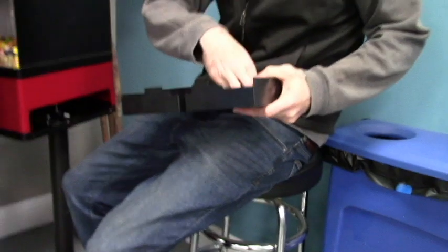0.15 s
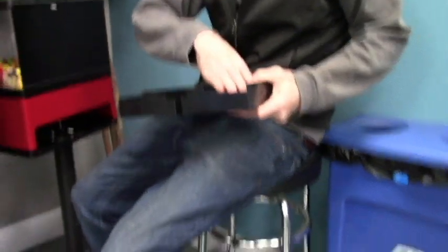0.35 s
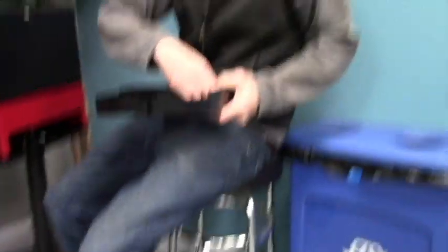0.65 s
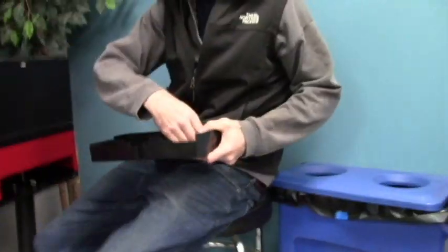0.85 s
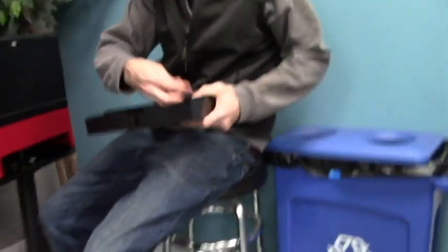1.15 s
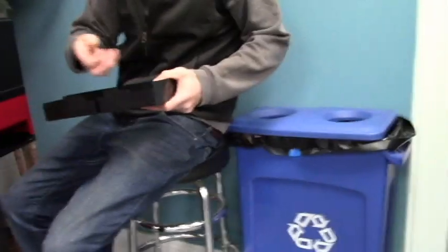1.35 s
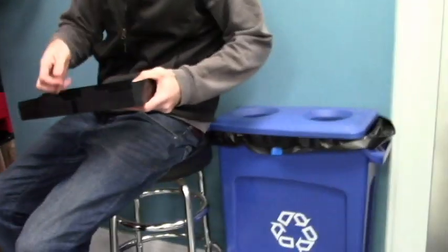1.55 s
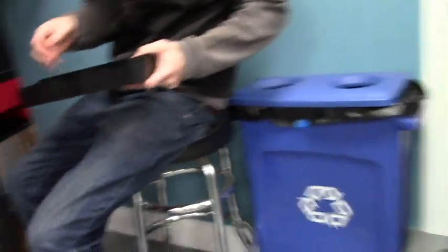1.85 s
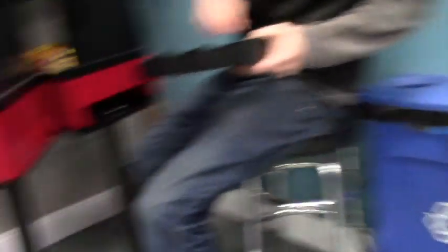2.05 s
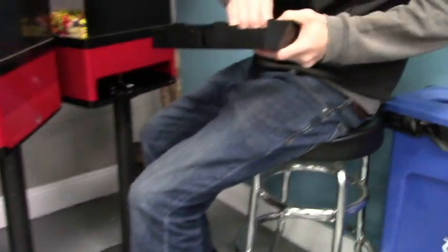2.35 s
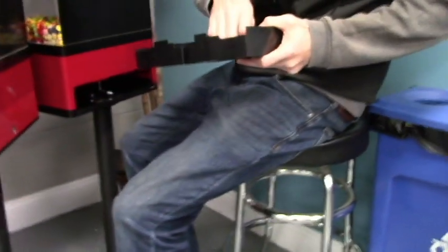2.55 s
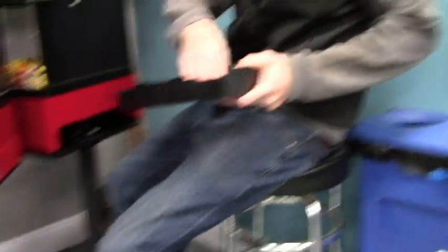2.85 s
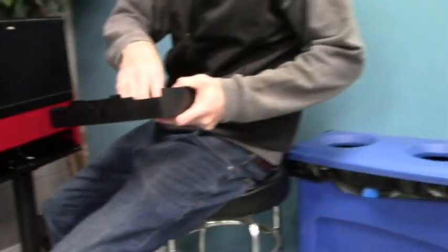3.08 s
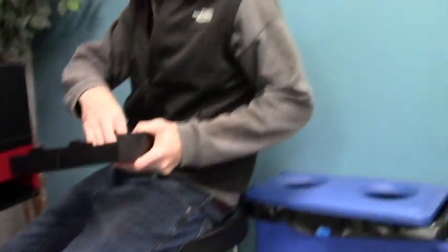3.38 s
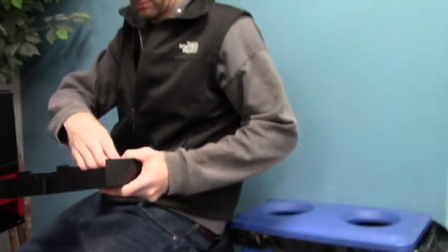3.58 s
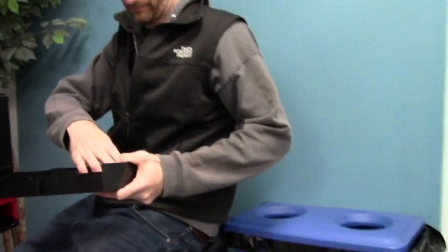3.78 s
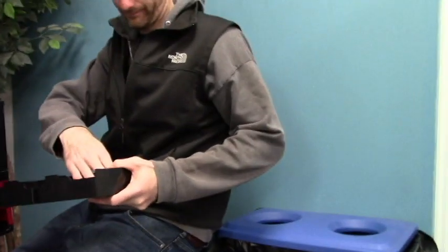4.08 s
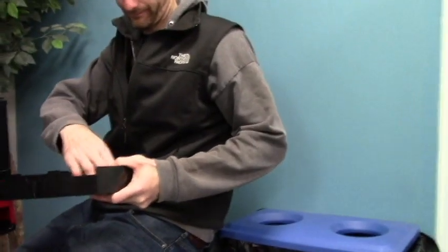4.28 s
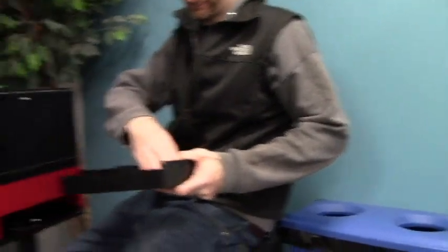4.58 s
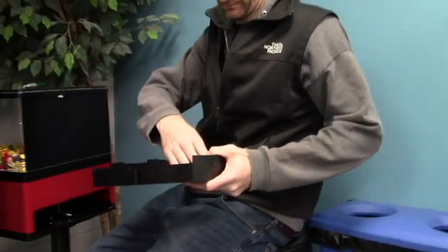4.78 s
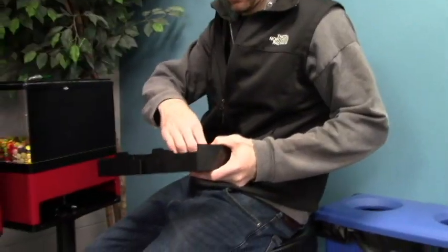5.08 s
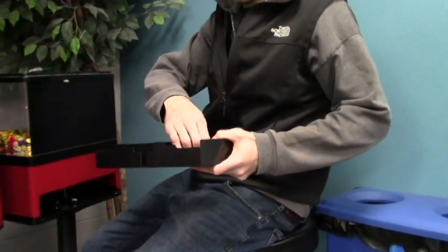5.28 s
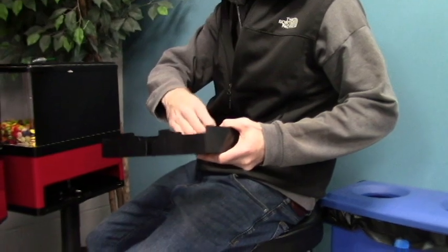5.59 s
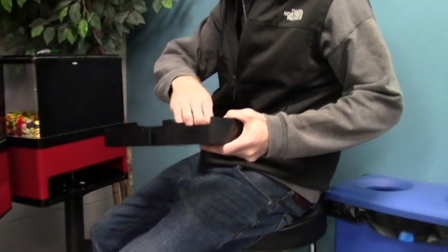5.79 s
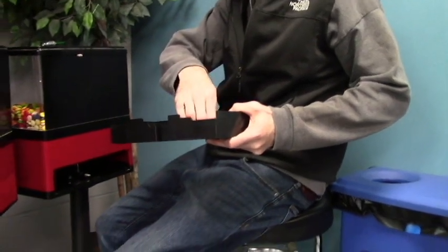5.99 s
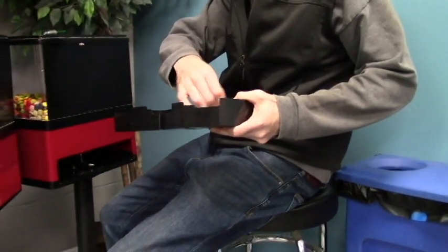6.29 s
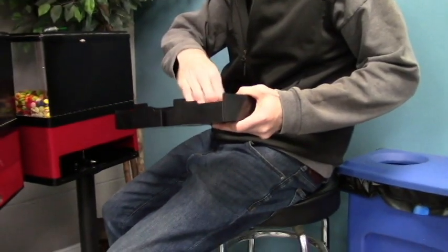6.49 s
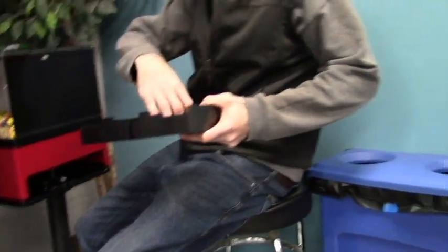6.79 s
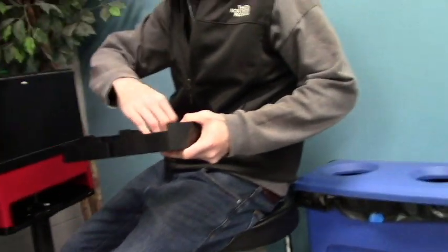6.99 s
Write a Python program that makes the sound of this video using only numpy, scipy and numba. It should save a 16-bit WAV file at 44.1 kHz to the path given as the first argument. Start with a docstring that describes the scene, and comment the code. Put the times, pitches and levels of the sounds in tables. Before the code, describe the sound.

Coins are picked through by hand in a plastic tray, heard closely in a small hard-walled room with steady low motor hum, gently beating, and soft fan rush. It opens at once with loud clacks and a gritty slide, a soft tray knock at 0.2 s, and more small clinks to 0.6. Around 0.9-1.2 s there is scraping, a short rising plastic groan, and sharp clacks. Then it thins, with faint high coin rings at 1.2-1.7. A loud scatter bursts at 1.8-2.0, followed by light picking. Clatter thickens from 2.9 and peaks at 3.9-4.2, with more strong clacks at 4.7 and 5.05. After a sparse stretch with small clicks at 5.5 and 5.7, a handful drops at 6.1 with the heaviest, hollow thump; dull knocks and bright clatter crowd 6.3-6.65, then faint taps settle into the hum by 7.

```python
"""Coins are picked through in a plastic tray on a lap, in a small hard-walled room with a machine humming throughout.
From the start, pushed coins slide as trains of tiny contacts and landing coins clack as short filtered noise bursts.
Soft knocks on the tray follow from 0.2 s, faint modal rings from 0.4 s, and a stick-slip groan at 0.9 s.
A handful is dropped back in near 6.1 s, with the heaviest knock; a limiter ducks under the loudest clatter."""
import sys
import numpy as np
from scipy import signal
from scipy.fft import rfft, irfft, next_fast_len
from scipy.io import wavfile
from scipy.ndimage import uniform_filter1d, minimum_filter1d
from numba import njit

SR = 44100
rng = np.random.default_rng(int(sys.argv[2]) if len(sys.argv) > 2 else 0)


def bounce(signal):
    """Save signal as a 16-bit WAV file at the path given by the first command-line argument."""
    frames = np.transpose(np.atleast_2d(signal))
    limited = np.clip(frames, -1, 1)
    pcm = np.round(limited * 32767).astype(np.int16)
    wavfile.write(sys.argv[1], SR, pcm)


N = 314785


def undb(db):
    """Level definition: an amplitude ratio is ten to the power dB / 20."""
    return 10 ** (np.asarray(db) / 20)


def unit(x):
    """Energy normalisation: the squared samples sum to one."""
    return x / np.sqrt(np.sum(x ** 2) + 1e-18)


def fade(t, t60):
    """Exponential decay, 60 dB down after t60 seconds."""
    return np.exp(-np.log(1000) * t / t60)


def colour(x, points):
    """Minimum-phase filtering: folding the cepstrum makes a (Hz, dB) gain outline causal."""
    size = next_fast_len(len(x) // 2 + 1024, real=True) * 2
    outline_hz, outline_db = np.transpose(points)
    f = np.maximum(np.arange(size // 2 + 1) * SR / size, 1)
    gain_db = np.interp(np.log(f), np.log(outline_hz), outline_db)
    cepstrum = irfft(np.log(undb(gain_db)))
    cepstrum[1:size // 2] *= 2
    cepstrum[size // 2 + 1:] = 0
    response = np.exp(rfft(cepstrum))
    return irfft(rfft(x, size) * response)[:len(x)]


def band_power(x, lo_hz, hi_hz):
    """Parseval's theorem: the energy between two frequencies is summed from the spectrum."""
    f = np.arange(len(x) // 2 + 1) * SR / len(x)
    inside = (f > lo_hz) & (f < hi_hz)
    return 2 * np.sum(np.abs(rfft(x)[inside]) ** 2) / len(x) + 1e-18


def add(track, s, sound):
    """Superposition: mix a sound into the track at time s."""
    i = int(np.clip(s * SR, 0, N - 1))
    track[i:i + len(sound)] += sound[:N - i]


def walk(rate):
    """Slow random drift: normal draws, rate of them per second, joined by straight lines."""
    t = np.arange(N) / SR * rate
    return np.interp(t, np.arange(1024), rng.standard_normal(1024))


def ring(modes, t, detune, scatter_db):
    """Modal synthesis: decaying sines, whose pitch and weight are redrawn at each call."""
    chance = rng.standard_normal((len(modes), 2))
    out = 0
    for (hz, db, t60), (weight, shift) in zip(modes, chance):
        mode = np.sin(2 * np.pi * hz * (1 + detune * shift) * t) * fade(t, t60)
        out = out + undb(db + scatter_db * weight) * unit(mode)
    return out


# early echoes and late tail: level in dB, t60 in s
ECHO_DB, ECHO_T60, TAIL_DB, TAIL_T60 = 3, 0.16, -4.5, 0.49
TAIL_DAMP = 0.67  # how much the far walls dull the tail (0-1)


def echoes():
    """Room reverberation: a quick spray from nearby surfaces, then a duller diffuse tail, drawn anew at each call."""
    t = np.arange(SR // 2) / SR
    near, gaps, far = rng.standard_normal((3, len(t)))
    spray = unit(near * undb(3.4 * gaps) * fade(t, ECHO_T60) * np.minimum(t / 0.00098, 1))
    tail = unit(far * fade(t, TAIL_T60) * np.minimum(t / 0.057, 1))
    dull_tail = signal.lfilter([1 - TAIL_DAMP], [1, -TAIL_DAMP], tail)
    return undb(ECHO_DB) * spray + undb(TAIL_DB) * dull_tail


def blow(chatter_s, rise_s=0.0011, patchy_db=3):
    """Impact excitation: a burst of tiny contacts swells and settles, followed by its echoes."""
    echo = echoes()
    t = np.arange(len(echo)) / SR
    grit, gaps = rng.standard_normal((2, len(t)))
    swell = np.exp(-t / chatter_s) * (1 - np.exp(-t / rise_s))
    return unit(grit * undb(patchy_db * gaps) * swell) + echo


# Modes of the tray.
# Each row: frequency in Hz, level in dB, t60 in seconds.
TRAY_MODES = [(673.2, -16.5, 0.32), (842, -22, 0.15), (1048, -14, 0.11), (1320, -18.5, 0.045),
              (1987, -23, 0.06), (3313, -23.5, 0.011)]
# Filter outline of the damped coin heap.
# Each row: frequency in Hz, gain in dB.
HEAP_OUTLINE = [(60, -57), (200, -22.5), (400, -6.5), (700, 1), (1200, -0.5), (2000, 0), (3200, 0.5),
                (4500, -1.5), (6500, -2), (8000, -5), (10000, -3), (12500, -10.5), (14750, -17),
                (15150, -12), (15700, -14.5)]


def heap(force):
    """Source-filter principle: contact forces sound through the damped heap and shake the tray under it."""
    body = ring(TRAY_MODES, np.arange(SR // 12) / SR, detune=.02, scatter_db=3)
    shaken = signal.fftconvolve(force, body)[:len(force)]
    return colour(force + undb(-9.5) * shaken, HEAP_OUTLINE)


def wedged(t60, count=11):
    """Heavy damping: pressed coins ring briefly, redrawn for each landing and each small group of sliding contacts."""
    modes = [(hz, 0, t60) for hz in np.geomspace(1200, 11000, count)]
    return unit(ring(modes, np.arange(SR // 12) / SR, detune=.1, scatter_db=4))


SHAFT_HZ = 24.15  # turns of the fan shaft per second
# Multiples of the shaft speed that hum.
# Each entry: multiple of the shaft frequency (no unit).
SHAFT_MULTIPLES = (3, 4, 7, 8, 9, 10, 15)
# Strength of each shaft multiple, in the same order.
# Each entry: rms level in dB.
SHAFT_LEVELS = (-63.5, -64.5, -57.5, -67, -49.5, -52.5, -49)
# Spectrum outline of the rushing air.
# Each row: frequency in Hz, relative level in dB per Hz.
AIR_OUTLINE = [(25, -22), (60, -22), (110, -10), (217, -0.5), (309, -1), (591, -2.5), (695, -8.5),
               (775, -6.5), (840, -11), (1400, -16), (1520, -16.5), (7710, -30.5), (9070, -34),
               (11600, -39), (16000, -34)]
AIR_DB = -40.5  # rms, before a slow drift
# a motor slips just behind the mains hum; both are in step at IN_STEP_S
MAINS_HZ, SLIP_HZ, IN_STEP_S = 120, .92, 1.28
MAINS_DB, MOTOR_DB = -50, -55  # rms


def machine():
    """Beating and harmonics: a motor beats with the mains hum beside fan-shaft tones, over the rush of moved air."""
    t = np.arange(N) / SR - IN_STEP_S

    def tone(hz, db, drift=0):
        """Simple harmonic motion at an rms level; drift in radians."""
        return undb(db) * np.sqrt(2) * np.cos(2 * np.pi * hz * t + drift)

    motor = tone(MAINS_HZ, MAINS_DB) + tone(MAINS_HZ - SLIP_HZ, MOTOR_DB)
    wander = .03 * walk(2.5)
    shaft = sum(tone(k * SHAFT_HZ, db, k * wander) for k, db in zip(SHAFT_MULTIPLES, SHAFT_LEVELS))
    air = unit(colour(rng.standard_normal(N), AIR_OUTLINE)) * np.sqrt(N)  # rms of one
    return motor + shaft + undb(AIR_DB + 0.49 * walk(4.12)) * air


def clink(force):
    """Resonant coupling: a group of sliding contacts is tinted by the quickly damped ring of the coins it meets."""
    return force + undb(-9) * signal.fftconvolve(force, wedged(t60=.012))[:len(force)]


# a push of GRIP_DB takes hold in GRIP_S; the heap settles once it ends
GRIP_S, GRIP_DB, SETTLE_T60_S = 0.0078, -20, 0.087


def push(t, length, db):
    """Friction drive: a push takes hold, more slowly when gentler, lasts, and dies away as the coins settle."""
    grip_s = GRIP_S * np.sqrt(undb(GRIP_DB - db))
    return np.minimum(t / grip_s, 1) * fade(np.maximum(t - length, 0), SETTLE_T60_S)


# Fingers push coins over each other.
# Each row: start in seconds, length of the push in seconds, level in dB,
# tray body in dB and bright edge in dB, both relative to that level.
PUSHES = [(0, 0.1, -20.5, -11, -10.5), (.245, 0.06, -31.5, -6, -4.5), (.29, .025, -19, -7, -5.5),
          (.474, 0.018, -25, -4, -14), (.55, 0.16, -38.5, -2, -13), (.79, 0.054, -40, 8, -10),
          (.875, 0.17, -22.5, -5.5, -8), (1.065, 0.088, -20.5, -6, -1), (1.17, 0.1, -26.5, -10.5, -7),
          (1.335, 0.064, -46.5, -14, 7.5), (1.628, 0.022, -41.5, -16, 16.5), (1.767, 0.18, -13.5, -5, -3),
          (2.262, 0.08, -30, -1, -11.5), (2.43, 0.12, -45, 1, -8), (2.589, 0.15, -48, 5, -11),
          (2.864, 0.037, -23.5, -14, -18), (3.424, 0.041, -20.5, -11, -6), (3.455, 0.062, -22.5, -6.5, -7),
          (3.615, .13, -29, -1.5, -3.5), (3.893, 0.075, -25, -8, -6.5), (3.924, 0.07, -19, -19, -2.5),
          (4.085, 0.04, -16, -14, -12), (4.16, 0.1, -32.5, -8, -16), (4.359, 0.074, -32, -8, -12.5),
          (4.535, 0.057, -26.5, -7, -10), (4.645, .08, -28.5, -3.5, 1), (5.04, 0.025, -14, -16, -5),
          (5.115, 0.0073, -19, -20, 3), (5.435, 0.074, -40.5, -1, -12), (5.71, 0.042, -34, 1, -8),
          (5.745, 0.0053, -14, -21, -12), (5.97, 0.03, -51, -12, 3), (6.22, 0.04, -32.5, -8, 4),
          (6.46, 0.045, -21, -11, -2.5), (6.89, .05, -35, -4.5, -12.5)]
# Tray body, clack and bright edge of a contact.
# Each row: low limit in Hz, high limit in Hz.
CONTACT_BANDS = [(400, 1200), (1200, 5000), (5000, 18000)]
CONTACTS_PER_S = 560


def stirs(spread_db=4.5, colour_scatter_db=4, echo_db=-4.5, count=4):
    """Sliding friction as a random impulse train: hundreds of contacts a second, some dull, some bright."""
    out, t = np.zeros(N), np.arange(SR // 2) / SR
    n = len(t)
    for s, length, db, body_db, edge_db in PUSHES:
        effort = push(t, length, db)
        hit, size = rng.random((2, n))
        coin = rng.integers(0, count, n)
        sign = rng.choice([-1, 1], n)
        contacts = (hit < CONTACTS_PER_S / SR) * sign * undb(-spread_db * np.log(size + 0.089))
        for band, band_db in zip(CONTACT_BANDS, (db + body_db, db, db + edge_db)):
            force = contacts * undb(colour_scatter_db * rng.standard_normal(n))
            # the hand's push sets the power, however many contacts share it
            local_power = uniform_filter1d(force ** 2, size=1800)
            force = effort * force / np.sqrt(local_power + 1e-3)
            x = heap(sum(clink(force * (coin == k)) for k in range(count)))
            x = signal.sosfilt(signal.butter(3, band, "band", fs=SR, output="sos"), x)
            x = x + undb(echo_db) * signal.fftconvolve(x, echoes())[:n]
            add(out, s, undb(band_db) * unit(x) * np.sqrt(np.sum(effort ** 2)))
    return out


# Coins land on the heap.
# Each row: start in seconds, strength in dB, pitch of the clack in Hz, tray body in dB,
# bright edge in dB, decay constant of the contact chatter in ms.
LANDINGS = [(0.0014, 15, 1380, -5.5, -3.5, 5), (0.0371, 14, 3160.0, -10, -5.5, 3.4),
            (0.0649, 19.5, 1300, -4.5, -7, 10), (0.135, 0, 1400.0, -4, -3.5, 1.5),
            (0.3074, 8, 4500, -3, 4, 3.0), (0.416, -7.5, 2570.0, -1, -4, 3.0),
            (0.4583, -3, 1400.0, 6, -6, 3.0), (0.4741, 11.5, 2680, 2, -11, 3.3),
            (0.4899, 14, 4630, -2, -1.5, 4.4), (0.5453, 0.0, 2120.0, 0.0, -1, 2.0),
            (0.6157, 0, 1460, -12.0, -8.5, 1.8), (0.6552, -7.5, 1400.0, 5, -7.0, 1.75),
            (0.814, -1.5, 1560, 7, -9, 3.2), (0.8278, -2.5, 1500, -1, -12, 2.3),
            (0.8723, 10, 2040.0, -15.0, -12, 1), (0.9057, 9, 4340, -9.0, -5.5, 1.7),
            (0.9718, 10.0, 1410, 2, -25, 3.3), (0.9954, 11, 4140.0, -21, 1.5, 8.4),
            (1.062, 15, 3410.0, -22, 0.5, 2.7), (1.0911, 19.5, 3450, -32, -12, 1),
            (1.1897, 4.5, 4300.0, -20, -10, 3.0), (1.233, 6.0, 4150, -1.5, -1.5, 7.1),
            (1.3061, 0, 4440, -13, 0.5, 2.0), (1.7664, 21, 3160.0, -3, 2, 4.5),
            (1.8894, 17, 2820, -20, 0.5, 5.3), (1.9177, 20, 2760, -28, -3, 2.5),
            (2.0293, 9.0, 3550, -0.5, -5.5, 2.48), (2.1952, -3.5, 3880.0, 7.5, -4, 2.0),
            (2.2063, 7.5, 3900, -6, -5.5, 1.9), (2.248, -0.5, 3100, -2, -3, 2.0),
            (2.2618, 12.0, 1590, 1, -11, 3.5), (2.2803, 7.0, 1960, -18, -19, 2.0),
            (2.3078, 6.0, 3020, -10, -5.5, 1.4), (2.4644, -3.5, 2360, -10, -10, 3.4),
            (2.587, -2.5, 1580, 2.5, -8, 2.8), (2.6564, -7.0, 2960.0, -4, -4.5, 3.7),
            (2.7657, 1, 1540, -1.5, -13, 2.8), (2.8973, 4.5, 2920, -6, 1.5, 3.0),
            (2.9254, 13.5, 4450, -9.0, -14, 4.1), (2.9935, 9.5, 2360, -7.5, -7.0, 4.6),
            (3.0709, -2.5, 1460, 4.5, -15.0, 7.1), (3.1402, 11.0, 2400, -20.0, -5.5, 4.2),
            (3.229, -2.0, 1500, -11.0, -7, 2.5), (3.2523, 11.0, 3200, -12, -3.0, 5.6),
            (3.3504, 5.5, 1560, -3.5, -4, 1.5), (3.4493, 11, 6500, -10, 2, 3.6),
            (3.4605, 12.5, 3200.0, -14, -14, 2.3), (3.506, 11, 2500.0, -34, -0.5, 2.9),
            (3.6048, 9, 1820, 1.5, -5, 1.6), (3.6148, 15.5, 1510, -9, -27, 1),
            (3.6611, 14.5, 6760, -4, -0.5, 0.82), (3.6948, 13.5, 2530, -7, -24, 2.5),
            (3.8041, 12.0, 6330.0, -7, -7, 1.5), (3.9434, 21.5, 3720, -4, -4, 5.5),
            (4.0931, 19.5, 3350, -18, -20.0, 1.6), (4.1156, 15.5, 1870, -10, -20.0, 5.4),
            (4.2264, 16.0, 5000, -13, -3.5, 6.8), (4.4879, -8.5, 6300, -14, -5, 2.2),
            (4.5522, 9.5, 2360, -13, -12.5, 2.7), (4.6403, 8.0, 6700, -24, -4, 3.6),
            (4.6896, 6.0, 1960.0, -16, -4.0, 3.8), (4.7117, 19, 4160, -10, -1.5, 6.3),
            (4.8442, -0.5, 1820, -2, 1.5, 15), (5.04, 15.5, 4160, 0.5, 1, 4.4),
            (5.0608, 19.5, 2520, -30, -5, 2.1), (5.0732, -7, 2570.0, -17, 22.5, 2.0),
            (5.472, -2.5, 2710, 8, -16, 3.5), (5.5259, 8.0, 2440, -2.5, -1.5, 0.9),
            (5.7074, 4.5, 2410.0, -8.0, -1.0, 3.4), (5.7217, 5, 1490.0, 0, -1, 1.4),
            (5.7457, 8, 1670, -2, 4, 2.3), (6.101, -4.0, 1370, -9, -9, 21),
            (6.1292, 21.5, 3520, 1, -6.5, 2.5), (6.243, 0.5, 2530.0, -13, 2, 2.0),
            (6.2756, 20, 2450, -1, -9.5, 6.5), (6.3205, 12.5, 2600.0, -8, -10, 3.3),
            (6.4303, 14, 5400, -11, -5, 2.9), (6.4467, 17.5, 6250.0, -1, -3.5, 10),
            (6.6912, -7.5, 1460.0, 14, -13, 2.5), (6.7603, -8, 1400.0, 4, -9, 2.5),
            (6.8034, 0.0, 1800, 4, -6, 5.1), (6.9292, -9, 1400.0, 2, -20, 2.1)]
# Plate modes of a coin, which also ring in chimes().
# Each row: frequency in Hz, level in dB, t60 in seconds.
COIN_MODES = [(6200, -27, .2), (9650, -15, 0.067), (9400, 14, 0.096), (9870, 2, 0.04), (10800, -15, 0.073),
              (15200, -4, 0.19), (15400, -4, 0.15)]


def clacks(clink_db=-7, clink_t60=0.1, shimmer_db=-14, pitch_db=2, pitch_q=9):
    """Damped impact: a landing coin gives a dry, pitched clack, a short clink and a shimmer of coins around it."""
    out, t = np.zeros(N), np.arange(SR // 5) / SR
    for s, db, hz, body_db, edge_db, chatter_ms in LANDINGS:
        force = blow(chatter_ms / 1000)
        add(force, 0, undb(clink_db) * wedged(clink_t60))
        resonator = signal.iirpeak(hz, pitch_q, fs=SR)
        force = force + undb(pitch_db) * signal.lfilter(*resonator, force)
        x = colour(heap(force), [(750, body_db), (1600, 0.014), (3800, 0.0058), (7500, edge_db)])
        # strength is the energy of the middle band, so body and edge stay relative to it
        add(out, s - .0005, undb(db) * x / np.sqrt(band_power(x, 1240, 5100)))
        shimmer = unit(ring(3 * list(COIN_MODES), t, detune=.012, scatter_db=2))  # three coins
        add(out, s, undb(db + edge_db + shimmer_db) * shimmer)
    return out


# Dull knocks on the tray.
# Each row: start in seconds, strength in dB, gain of the upper knock in dB,
# floor panel and rim in dB relative to the strength.
TRAY_KNOCKS = [(.227, 14.5, -5, -41), (0.859, 7, -4, -17), (1.084, 6.5, -2, -25), (6.13, 21, 1, 1.5),
               (6.329, 12, -4, -16), (6.402, 18.5, -10.5, -20), (6.416, 18.5, -5, -22),
               (6.466, 17, -5.5, -28), (6.481, 17, -7, -28), (6.562, 13, -13, -17), (6.628, 18, -7, -38.5)]
# Filter outline of a tray thud.
# Each row: frequency in Hz, gain in dB.
THUD_OUTLINE = [(50, -53), (95, -16), (150, -6.5), (260, 1), (380, 2.5), (560, -3), (850, 0), (1300, -7),
                (2500, -18), (6000, -38)]


def knocks(thud_s=0.0027, panel_hz=870, rim_hz=3640, rim_db=-9):
    """Forced body resonance: soft, heavy blows make the tray thud; square hits also wake its floor panel and rim."""
    out, t = np.zeros(N), np.arange(SR // 2) / SR
    for s, db, upper_db, panel_db in TRAY_KNOCKS:
        thud = colour(blow(thud_s, rise_s=0.00083), THUD_OUTLINE)
        thud = colour(thud, [(480, 0), (800, upper_db)])
        rattle = rng.standard_normal(len(t)) * fade(t, .17)
        panel = unit(colour(rattle, [(panel_hz / 2, -30), (panel_hz, 0), (panel_hz * 2, -36), (8000, -70)]))
        rim = undb(rim_db) * unit(np.sin(2 * np.pi * rim_hz * t) * fade(t, 0.1))
        add(out, s, undb(db) * (unit(thud) + undb(panel_db) * (panel + rim)))
    return out


# Coins that bounce free and ring.
# Each row: start in seconds, strength in dB.
FREE_RINGS = [(.372, -6.5), (.872, -10), (1.17, 0), (1.349, -3.5), (1.47, -12.5), (1.542, -18), (1.653, 6),
              (3.451, -2), (6.219, -7), (6.431, 5)]


def chimes():
    """Free vibration: a coin that lands clear of the heap rings on, its close modes beating."""
    out, t = np.zeros(N), np.arange(SR // 2) / SR
    for s, db in FREE_RINGS:
        metal = ring(COIN_MODES, t, detune=.004, scatter_db=1.5)
        reverberant = signal.fftconvolve(metal, echoes())[:len(t)]
        add(out, s, undb(db) * unit(metal + reverberant))
    return out


def groan(start=.862, end=0.97, start_hz=205, end_hz=236, db=-26):
    """Stick-slip oscillation: scooping fingers catch on the plastic in a short, rising, unsteady groan."""
    t = np.arange(N) / SR
    hz = np.interp(t, [start, end], [start_hz, end_hz]) * (1 + 0.028 * walk(122.0))
    phase = 2 * np.pi * np.cumsum(hz) / SR
    grip = uniform_filter1d(1. * ((t > start) & (t < end)), size=200)
    return undb(db) * grip * (np.sin(phase) + undb(-4.5) * np.sin(2 * phase))


def scene():
    """Mid-side stereo: two close microphones hear nearly the same, apart from a trace of echoes and their own noise."""
    mid = machine() + stirs() + clacks() + knocks() + chimes() + groan()
    early = unit(echoes()[:SR // 50])
    side = colour(signal.fftconvolve(mid, early)[:N], [(100, -27.5), (800, -43), (2500, -24.5), (9000, -25.0)])
    hiss = colour(rng.standard_normal(N), [(30, 6), (300, 20.5), (2000, 5.5), (15000, -3)])
    side = side + undb(-34) * mid + undb(-65.5) * hiss  # the share of mid shifts the balance slightly
    return np.array([mid + side, mid - side])


@njit
def follow(x, attack, release):
    """Envelope detection: a one-pole smoother with separate rates for rise and fall."""
    out, e = np.empty(len(x)), 0.
    for i in range(len(x)):
        e += (x[i] - e) * (attack if x[i] > e else release)
        out[i] = e
    return out


TOP_HZ = 15780  # upper band limit


def record(dry, limit_db=-7, attack_s=0.001, release_s=0.021):
    """Look-ahead limiting holds down the loudest clatter; stray peaks are rounded, rumble and top are cut."""
    envelope = follow(np.abs(dry).mean(axis=0), 1 / (attack_s * SR), 1 / (release_s * SR))
    gain = np.minimum(1, undb(limit_db) / (envelope + 1e-9))
    # the centred windows, in samples, let the gain fall a moment ahead
    x = dry * uniform_filter1d(minimum_filter1d(gain, size=80), size=80)
    x = x / (1 + (x / .95) ** 6) ** (1 / 6)
    x = signal.sosfilt(signal.butter(3, 42, "high", fs=SR, output="sos"), x)
    return signal.sosfilt(signal.ellip(10, .2, 80, TOP_HZ, fs=SR, output="sos"), x)


dry = scene()
out = record(dry)
bounce(out)
```